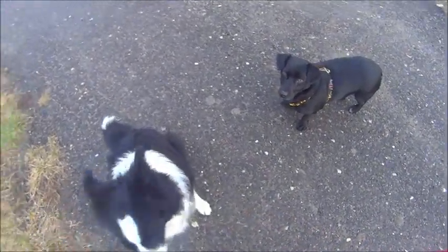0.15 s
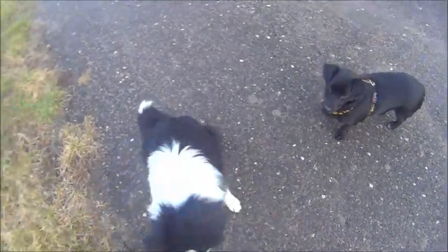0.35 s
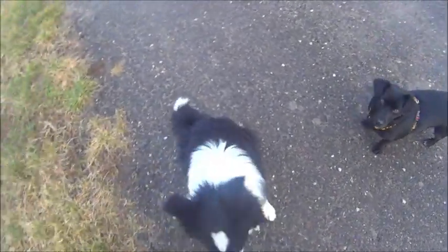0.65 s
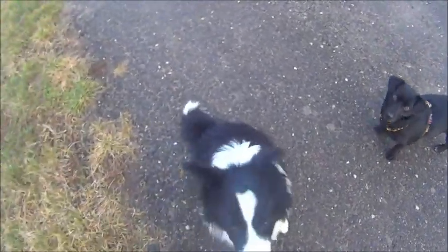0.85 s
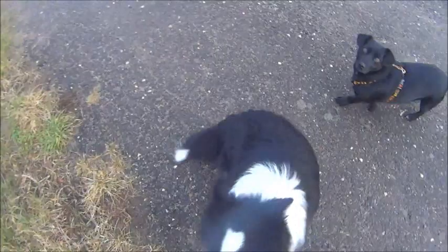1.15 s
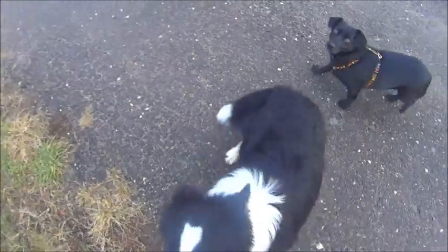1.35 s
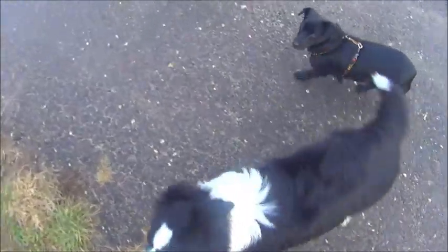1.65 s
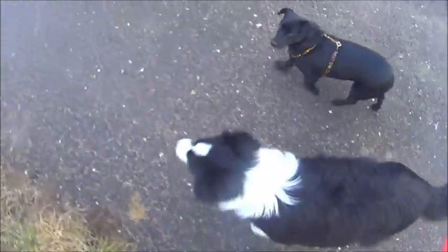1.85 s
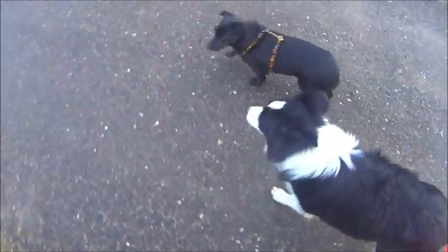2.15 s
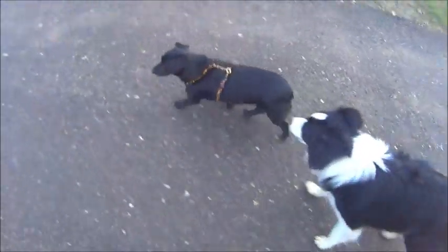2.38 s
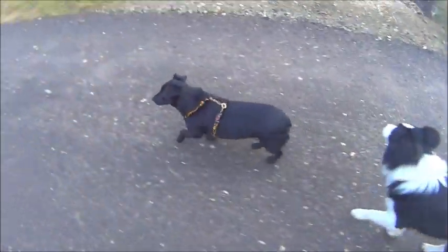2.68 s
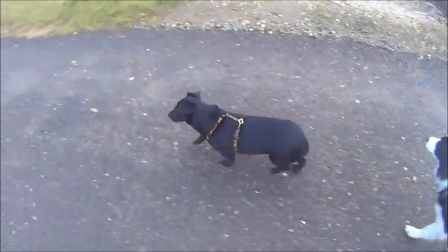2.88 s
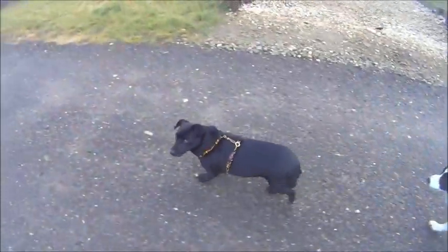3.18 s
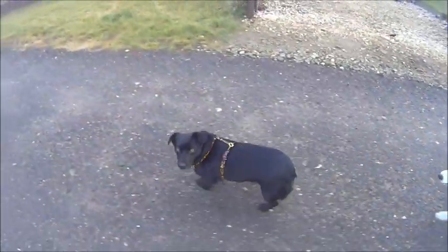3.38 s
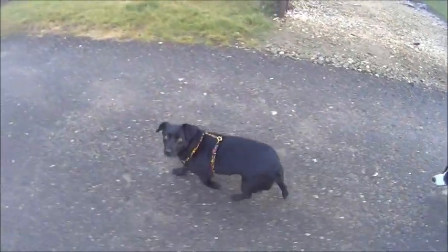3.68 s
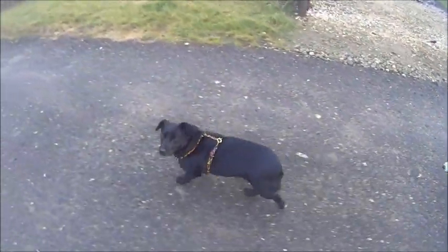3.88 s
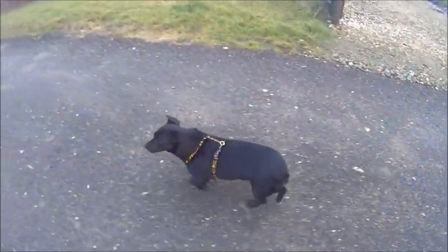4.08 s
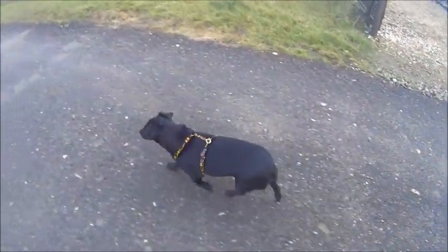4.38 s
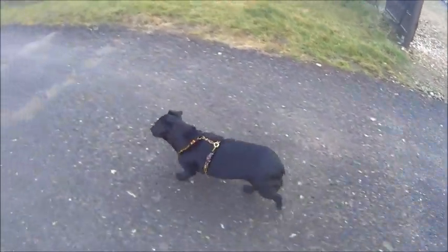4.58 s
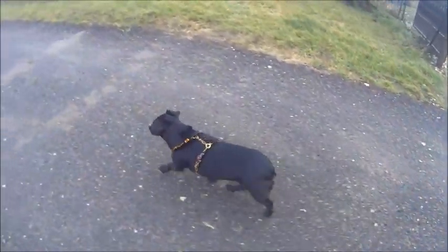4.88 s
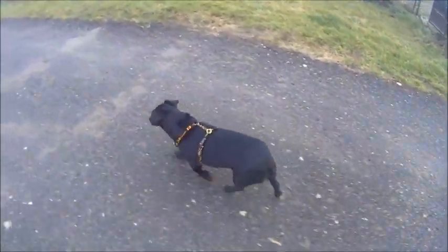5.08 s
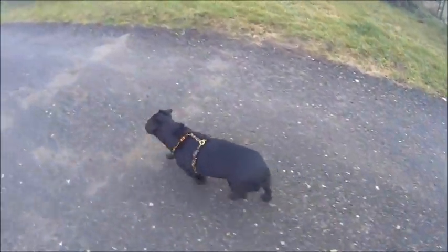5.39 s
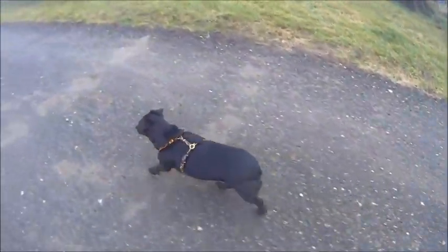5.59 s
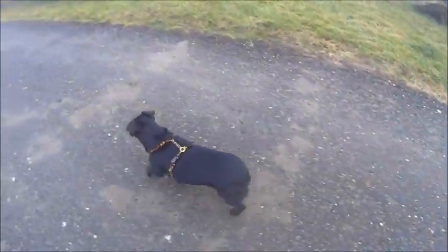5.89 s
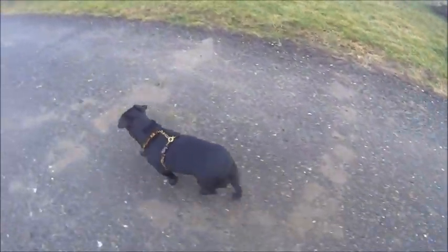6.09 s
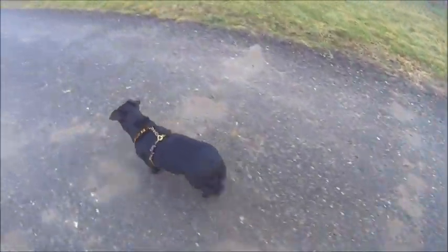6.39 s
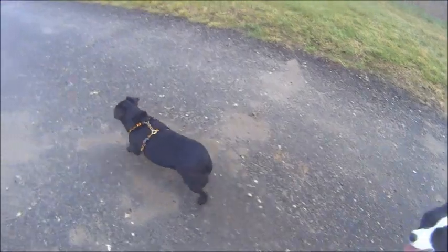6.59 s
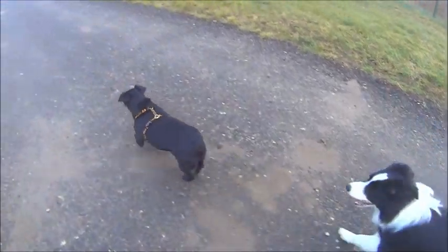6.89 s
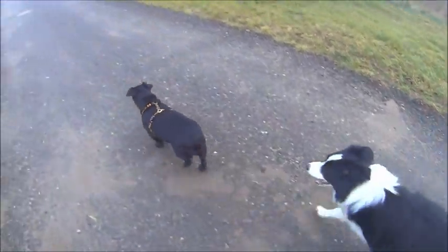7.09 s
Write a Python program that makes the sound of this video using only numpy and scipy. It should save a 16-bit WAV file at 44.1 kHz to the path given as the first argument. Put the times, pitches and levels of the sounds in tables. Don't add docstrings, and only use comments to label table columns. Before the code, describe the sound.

Close, dry handling noise outdoors: a hand and strap slide, tick and bump on a light plastic housing, ringing in a narrow nasal midrange. Two strong clusters come in the first three seconds, then scattered paw clicks, sole scuffs and grit crackles on asphalt. A sharp click and small stone clinks arrive late. The stereo microphone sits inside the housing, with constant amplifier hiss and limited extreme treble.

```python
import sys
import numpy as np
from scipy import signal
from scipy.fft import rfft, irfft, next_fast_len
from scipy.io import wavfile
from scipy.ndimage import uniform_filter1d

SR = 44100
rng = np.random.default_rng(int(sys.argv[2]) if len(sys.argv) > 2 else 0)


def inscribe(sig):
    pcm = np.round(np.clip(np.atleast_2d(sig).T, -1, 1) * 32767)
    wavfile.write(sys.argv[1], SR, pcm.astype(np.int16))


def linear_from_db(decibels):
    return 10 ** (np.asarray(decibels, float) / 20)


N = 319718
SIZE = next_fast_len(N + 8192)
HZ = np.maximum(np.arange(SIZE // 2 + 1) * SR / SIZE, 1)
TIME = np.arange(N) / SR
SIDES = np.array([[1], [-1]])

# (f/Hz, level/dB per Hz)
HISS_COLOUR = [(20, -2), (70, -2), (400, -1.5), (1000, -0.5), (2000, -5.5), (4000, -8), (8000, -12.5),
               (11000, -14)]
# (f/Hz, common share/0-1)
HISS_ALIKE = [(60, 1), (200, 0.49), (800, 0.68), (2000, 0.75), (4500, 0.35), (7500, 0.22), (11000, 0.57)]
# (f/Hz, turn/half turns)
HISS_TURN = [(60, .1), (300, .7), (1300, 1.1), (1650, 2.2), (3000, 2.85), (4000, 3.2), (5500, 4.0),
             (11000, 4)]
# (f/Hz, width/Hz, level/dB, left minus right/dB)
WHINE = (6755, 45, -74, 0)
# (t/s, level/dB)
ARM_SWINGS = [(.67, -47), (.95, -65), (1.3, -67), (1.73, -53.5), (2.35, -54), (2.56, -48), (3.0, -56.5),
              (3.5, -58), (4.18, -53.5), (4.7, -55), (5.31, -55), (6.0, -57), (6.5, -49), (7.1, -64)]

# (f/Hz, width/Hz, level/dB, left minus right/dB, left lead/rad)
CAVITY = [(1590.5, 111, 9, 0.5, -0.63), (1693, 158, 2, 1.5, -0.58)]
UPPER_CAVITY = [(1993, 78, -11, 0.88, -1.14), (2086, 130, -16, 0.93, -0.74)]
SHELL = [(2890, 620, 9.6, 1.1, 0.24), (3052, 296, 17, 0.67, 1.7), (4080, 330, 1, 5, 0.87)]
GRIT = [(5610, 180, 2, -3, 2.2), (7120, 1040, -4, -0.5, 0.79), (8420, 520, -9, 2, 0.39),
        (7200, 1900, -8, 5, 1)]
BODY = [(360, 55, 11, 0.31, -2.5), (237, 183, 3, .3, 1.27), (486, 170, -3.5, .3, -1),
        (606, 170, -5, 0.33, 2), (854, 260, -4.5, 0.99, -2)]
DEEP = [(125, 109, 15, 0.39, -0.096), (70, 35, 10, .1, -.3)]
PANEL = [(520, 500, 0, 0.26, -2.1)]
STRAP_RING = [(4990, 470, 1.5, 0.84, 0.19), (4380, 150, -1.5, 5, 3.7)]
WHISTLE_RING = [(5050, 230, 0.1, -3.5, .17), (4730, 220, -8, -3, .5), (4450, 200, -12, -4, 3),
                (7000, 600, -14, 1.5, 1.2), (3700, 900, -19, 1.5, 1)]
SLACK_RING = [(4770, 470, -2, -7, .5), (4280, 390, -1.5, -10.5, 3.2)]
CRUMB_RING = [(2180, 250, 0, 2.3, -2.5)]
SNAP_RING = [(2630, 280, 0, 2.9, 0.62)]
CLAW_RING = [(2000, 370, 0, 1.5, -0.9)]
CRACKLE_RING = [(7750, 900, 0.11, 1, 0.56), (9000, 1500, -1.1, 0, .5)]
SLAM_RING = [(132, 260, -2, .3, -1.5), (400, 170, 8, .5, -1.5), (545, 150, -3, .3, -2.2),
             (776, 160, -16, 1, -1), (1140, 230, -10, 1, 2.5)]

# (t/s, peak/dB, f/Hz, left minus right/dB)
STONES = [
    (0.782, -50, 5130, -4),
    (1.7834, -55, 5840, -0.5),
    (2.2466, -52, 5230, 1),
    (6.251, -38.5, 5870, 3),
    (6.279, -44, 4380, -9),
    (6.3, -58, 4770, -5),
    (7.0727, -43.5, 5850, 1),
]
# (t/s, peak/dB)
CRACKLES = [(.86, -48), (.8715, -40), (.9024, -39), (3.2623, -45), (3.2842, -47), (3.3047, -46),
            (3.322, -47), (3.337, -48), (3.358, -41), (3.384, -41), (3.397, -44), (3.4114, -33),
            (3.419, -48), (6.256, -38), (1.065, -46), (1.082, -48)]
# (t/s, hold/s, level/dB, rise/s, fall/s)
FIZZ = [
    (3.285, .125, -60, .03, .03),
]
# (centre t/s, peak/dB, f/Hz, length/ms)
CHIPS = [(.570, -41, 5200, 6.4), (.5795, -33, 3340, 4.6), (3.5859, -33.5, 1730, 4), (.6185, -22, 3370, 5.1),
         (0.622, -33, 1530, 6.6), (.648, -36, 4960, 8), (3.578, -38.5, 1700, 5), (.668, -36, 1590, 8.2),
         (0.69, -36, 3270, 4.6), (0.696, -42, 1600, 6.5), (2.474, -38.5, 4900, 11), (2.484, -36, 3300, 12),
         (2.497, -32, 3330, 13), (2.537, -37, 3580, 8), (2.56, -36, 1540, 5.5), (2.9839, -38, 1780, 4),
         (3.323, -47, 1590, 12), (3.384, -33, 1590, 7.7), (3.387, -42, 3040, 7), (3.397, -42, 1640, 6),
         (3.428, -45, 1630, 4.7), (5.74, -58, 5050, 45), (5.768, -57, 5050, 21), (5.795, -61, 5080, 24),
         (5.781, -51, 1950, 7.9), (5.796, -51, 2130, 9.8), (5.818, -46.5, 1600, 11), (5.833, -50, 2170, 20),
         (5.864, -52.5, 1210, 9.2), (5.899, -51, 2080, 16), (6.2535, -30, 1970, 6.5), (6.262, -49, 3020, 7),
         (6.274, -51, 4770, 6.6), (6.276, -48, 1650, 7), (6.298, -51, 4700, 5.4), (6.363, -45, 2040, 11),
         (6.42, -43, 2000, 8), (6.4255, -46, 2000, 6), (6.447, -40, 1920, 7.9), (6.4545, -33, 2030, 8),
         (6.461, -50, 3150, 8.9), (6.461, -53, 4740, 8.7), (0.8537, -31.5, 1560, 7), (.896, -38, 1560, 8.4),
         (0.98, -44, 1590, 6), (1.065, -42, 1650, 4.2), (1.082, -45, 2020, 4.1), (2.8077, -34, 1530, 3.9),
         (2.8947, -34.5, 1690, 4.5), (3.822, -40, 1700, 6)]
# (f/Hz, left lead/rad)
CHIP_LEAD = [(1600, -0.11), (2100, -1.2), (3200, 2.33), (5000, 0.66)]
# (t/s, peak/dB, upper cavity/dB, brightness/dB)
CRUMBS = [(0.58, -44, -5, 6), (.645, -29, -11, -23), (0.698, -36, -9, -20), (2.458, -28.5, 0, -9),
          (2.4708, -26, -9, -16), (2.4756, -25, -6, -9), (2.493, -22, -6, -19), (2.504, -19, -11, -17),
          (2.5146, -30, -9, -16), (2.521, -26, -9, -14), (2.527, -27, -9, -12), (2.537, -28, -9, -10),
          (2.798, -37, 10, -14), (3.2633, -40, -12, -21.5), (3.285, -32, -10, -17), (3.304, -38, -12, -16),
          (3.313, -36, -12, -20), (3.321, -40, -14, -22), (3.337, -31.5, -13, -9), (3.368, -36, -14, -20),
          (3.395, -46, -14, -20), (3.412, -37, -12, -10), (3.425, -37, -12, -20), (3.4446, -43, -1, -20),
          (3.594, -39, -3, -16), (3.604, -40, -6, -20), (5.2644, -36, 0, -20), (5.2817, -42, -5, -19),
          (5.3153, -39, -10, -20), (5.323, -34.5, -13, -25), (5.329, -37, -14, -25), (5.341, -46, -4, -20),
          (5.3524, -57, -2, -20), (5.3818, -50, 0, -20), (5.389, -48, 8, -22), (5.3934, -53, 5, -20),
          (5.414, -51, 2, -20), (5.971, -44, -6, -21), (6.076, -49, -3, -20), (6.092, -45, -11, -23),
          (6.112, -38, -15, -23), (6.169, -42, -9, -23), (6.251, -33, 7, -12), (6.9782, -38, -6, -14),
          (6.998, -46, -5, -20), (7.015, -36, -8, -20), (7.023, -45, -2, -20), (7.056, -38, -6, -20),
          (7.0874, -49, 3, -20)]
# (t/s, hold/s, level/dB, rise/s, fall/s)
WHISTLE = [
    (.55, 0.069, -50, 0.059, 0.069),
    (.64, 0.015, -49, 0.049, 0.13),
    (.785, .01, -64, .03, .04),
]
# (t/s, hold/s, level/dB, rise/s, fall/s)
SLUMPS = [
    (.585, 0.051, -45, 0.087, 0.025),
    (.66, 0.024, -47, 0.051, 0.18),
]
# (t/s, hold/s, level/dB, rise/s, fall/s)
STRAP_SLIDES = [
    (.91, 0.0039, -62, 0.046, 0.028),
    (1.06, 0.02, -62.5, 0.04, 0.042),
    (2.276, .005, -67, 0.064, 0.066),
    (2.47, 0.063, -53, 0.033, 0.029),
    (3.276, 0.12, -63, 0.054, 0.16),
    (5.82, .01, -68, 0.027, .05),
    (6.275, 0.02, -65, 0.017, 0.03),
    (7.074, 0.0059, -62, .004, 0.016),
]
# (t/s, peak/dB, deep part/dB)
THUDS = [(0.464, -50.5, -17.5), (0.566, -49, -22), (0.612, -40.5, 2), (0.664, -46.5, 3), (0.69, -46, -5),
         (1.063, -41.5, -20), (1.126, -43, -18), (1.733, -46.5, -12), (1.831, -47.5, -7.5),
         (2.214, -48.5, -22), (2.269, -37, -25), (2.485, -37.5, -13), (2.545, -26.5, -13.5),
         (2.69, -37.5, -24), (2.7317, -31.5, -19.5), (2.845, -48, -11), (3.029, -39, -16),
         (3.275, -48.5, -11), (3.383, -41.5, -15), (3.577, -48, -17), (4.141, -48.5, -13),
         (4.428, -39.5, -27), (4.514, -47, -34), (4.594, -46.5, -40), (5.287, -60, -3), (6.448, -50, -23),
         (6.631, -53.5, -2)]
# (t/s, peak/dB)
SLAMS = [
    (.6165, -22.5),
    (2.5475, -20.5),
]
# (t/s, peak/dB, upper cavity/dB, brightness/dB)
CLAWS = [(0.5326, -41, 10, -14), (5.797, -54, 12, -15), (1.737, -50, -9, 3.5), (2.0828, -44.5, 15.5, -3.5),
         (2.3541, -39, 12.5, -16), (2.39, -30.5, -2, -19), (5.875, -37, 4, -20), (2.8, -25, -9, -27),
         (2.8067, -29, -17, -22), (2.8942, -33.5, -3, -17.5), (2.9829, -28, -8, -23), (3.0683, -34, 3, -20),
         (3.5768, -33, -22, -27), (3.583, -29, -22, -21), (3.8122, -33, -6, -30), (4.167, -23.5, -8, -21.5),
         (4.368, -41, 2.5, -21), (5.3646, -49.5, 13, -15), (5.4333, -50, 14, -10), (5.557, -33.5, -7, -27),
         (5.816, -42, 7, -13), (6.001, -40, -34, -33), (6.356, -36.5, 3, -13.5), (6.409, -45.5, 8, -1),
         (6.4504, -17.5, -4, -32), (6.518, -35, -14, -22), (6.762, -40.5, 5.5, -30),
         (6.854, -37.5, -25, -20), (6.955, -32, -3, -14), (7.0423, -46, 14, -24)]
# (t/s, peak/dB)
SNAPS = [(0.579, -34), (1.247, -46), (2.42, -43.5), (2.443, -50), (2.624, -41), (2.6918, -30),
         (2.7063, -46), (2.712, -42), (2.718, -38), (2.734, -19.5), (3.189, -42.5), (3.212, -48),
         (4.515, -48), (5.464, -46)]
# (t/s, peak/dB, brightness/dB, contact/ms)
KNOCKS = [(0.6167, -11, -20, 2), (0.6677, -25, -37, 2.3), (0.768, -36.5, -21, 2.4), (0.851, -42, -20, 3.9),
          (0.903, -33.5, -17, 5.4), (1.0338, -41, -17, 2.4), (1.1269, -33, -14.5, 1.6),
          (2.2146, -45, -12, 1.9), (2.2709, -22.5, -23, 2.9), (2.543, -24, -16, 3.5),
          (2.482, -18, -16, 4.8), (2.5474, -10, -18.5, 5.7), (2.5548, -12, -36, 2.4),
          (2.6068, -35, -13.5, 4.3), (5.826, -42, -13, 3.2), (3.247, -37, -30, 3.7), (3.275, -32, -20, 2.2),
          (3.2847, -49, -2.5, 3), (3.3811, -33, -13, 7.2), (3.407, -33, -16.5, 2.5),
          (3.984, -40.5, -20, 1.8), (4.1436, -34.5, -15.5, 8.1), (4.597, -42, -15, 1),
          (4.7555, -33.5, -28, 2.1), (4.828, -37.5, -34, 2), (5.3028, -38, -18, 4), (5.614, -44, -29, 2.7),
          (5.8893, -36, -29, 9.2), (6.2514, -24, -15.5, 4.5), (7.064, -23.5, -26, 1.9)]
# (t/s, level/dB, rise/s, fall/s)
GRIPS = [(.65, -48.5, 0.16, 0.21), (0.902, -44, 0.081, 0.056), (1.12, -59.5, 0.36, 0.63),
         (1.85, -58, 0.052, 0.37), (2.3, -60, 0.11, 0.085), (2.56, -42, 0.25, 0.075),
         (2.75, -59, 0.33, 0.35), (3.421, -50, 0.37, 0.043), (3.61, -52.5, 0.12, 0.02),
         (4.14, -64, 0.026, 0.088), (5.3, -54, 0.045, 0.04)]
# (t/s, level/dB, rise/s, fall/s)
SCUFFS = [(.44, -60.5, 0.99, 0.37), (.8, -59, 0.17, .2), (1.3, -64, 1, 0.43), (1.73, -56, 0.17, 0.17),
          (2.249, -60, 0.11, 0.092), (2.363, -50, 0.23, 0.13), (2.81, -57.5, 0.053, 0.37),
          (3.0, -56.5, 0.47, 0.81), (3.35, -48, 0.07, 0.14), (3.6, -55, 0.22, 1), (4.15, -53.5, 0.25, 0.18),
          (4.71, -54, 0.44, 1), (5.2, -55.5, 0.082, .1), (5.34, -58, 0.24, 0.58), (5.81, -64, 0.17, 0.17),
          (5.89, -52, 0.15, 0.077), (6.01, -53, 0.078, 0.3), (6.1, -64, 0.6, 0.2), (6.3, -58.5, .1, 0.46),
          (6.44, -54, 0.32, 0.23), (6.513, -58, 0.23, 0.082), (6.74, -61.5, 0.45, 1),
          (7.02, -51, 0.047, 0.073), (7.075, -50.5, 0.043, 0.066), (7.24, -60.5, 0.54, .2)]
# (t/s, hold/s, level/dB, rise/s, fall/s)
RUBS = [(.565, 0.039, -49, 0.094, 0.12), (.645, 0.038, -46.5, 0.061, 0.12), (.9, 0.024, -53, 0.13, 0.031),
        (1.11, 0.036, -53.5, 0.4, 0.036), (1.73, 0.0045, -61.5, 0.6, 0.085),
        (1.964, .005, -59.5, 0.24, 0.41), (2.265, .005, -50.5, 0.036, 0.079),
        (2.47, 0.042, -41, 0.024, 0.013), (2.52, 0.036, -33, 0.016, .008), (2.575, 0.03, -47, 0.013, 0.063),
        (2.685, 0.0055, -55, 0.02, 0.11), (3.278, 0.14, -55, 0.041, 0.027),
        (3.476, .005, -54.5, 0.05, 0.18), (4.12, .005, -65, 0.17, 0.084), (5.26, .005, -61.5, 0.2, .1),
        (5.81, .005, -61, 0.32, 0.15), (6.265, 0.0042, -60, .02, 0.063), (6.444, 0.0058, -61, 0.1, 0.062)]
# (cavity/dB, upper cavity/dB, body/dB, shell/dB, grit/dB)
RUB_MIX = (1.2, -5.5, -7.5, -2, -8.5)
SCUFF_MIX = (-0.3, -4.5, -14, -9, -16.5)
GRIP_MIX = (-22, -17, -1, -20, -10.5)


def unit(x):
    return x / np.sqrt(np.mean(x ** 2))


def smooth_twice(x, size):
    return uniform_filter1d(uniform_filter1d(x, size), size)


def shape(x, response):
    return irfft(rfft(x, SIZE) * response, SIZE)[..., :N]


def along(table):
    hz, value = np.transpose(table)
    return np.interp(np.log(HZ), np.log(hz), value)


def ring(hz, width):
    return 1j * HZ * width / (hz ** 2 - HZ ** 2 + 1j * HZ * width)


def body(modes):
    total = 0
    for hz, width, db, pan_db, lead in modes:
        steep = ring(hz, width) * ring(hz, 4 * width)
        total = total + linear_from_db(db + SIDES * pan_db / 2) * np.exp(.5j * SIDES * lead) * steep
    return total / np.abs(irfft(total, SIZE)).max()


def swells(s, db, rise_s, fall_s, hold_s=0):
    coarse = TIME[::32]
    late = coarse - np.asarray(s)[:, None]
    rise, fall, hold = (np.clip(v * np.ones(len(late)), 1e-3, 3)[:, None] for v in (rise_s, fall_s, hold_s))
    drop_db = 20 * np.maximum(np.maximum(-late / rise, (late - hold) / fall), 0)
    power = np.sum(linear_from_db(2 * (db[:, None] - drop_db)), axis=0)
    return np.interp(TIME, coarse, np.sqrt(power))


def held(table):
    s, hold_s, db, rise_s, fall_s = np.transpose(table)
    return swells(s, db, rise_s, fall_s, hold_s)


def blows(times, contact_ms, blow=1):
    age = np.abs(np.arange(700) - 60) / SR
    size = (len(times), 700)
    chatter = rng.standard_normal(size) * (rng.random(size) < .1)
    force = .3 * chatter * np.exp(-age / np.clip(contact_ms, .2, 20)[:, None] * 1000)
    force[:, 60] = blow
    force /= np.sqrt(np.sum(force ** 2, axis=1, keepdims=True))
    at = np.round(times * SR).astype(int)[:, None] + np.arange(700) - 48
    return at, force


def strike(at, force, db):
    x = np.zeros(N + 700)
    np.add.at(x, at, force * linear_from_db(db)[:, None])
    return x[:N]


def hits(table, modes, contact_ms, blow):
    s, db = np.transpose(table)
    at, force = blows(s, np.full(len(s), contact_ms), blow)
    return shape(strike(at, force, db), body(modes))


def contacts(housing, s, db, upper_db, shell_db, grit_db, contact_ms, soft=1, blow=1):
    at, force = blows(s, contact_ms * np.ones(len(s)), blow)
    bright = housing["grit"] + linear_from_db(-2.0) * housing["strap"]
    parts = ((housing["cavity"] * soft, db - 1.0),
             (housing["upper"] * soft, db + upper_db),
             (housing["shell"], db + shell_db),
             (bright, db + grit_db))
    return sum(shape(strike(at, force, part_db), response) for response, part_db in parts)


def grains():
    clicks_per_s, scatter_db, smooth = 1200, 1.5, 0.36
    size_db = scatter_db * np.minimum(rng.exponential(size=N), 4)
    clicks = (rng.random(N) < clicks_per_s / SR) * rng.choice([-1, 1], N) * linear_from_db(size_db)
    flurry = unit(smooth_twice(rng.standard_normal(N), 300))
    return unit(linear_from_db(2.7 * flurry) * (unit(clicks) + smooth * rng.standard_normal(N)))


def hiss():
    common, left, right, whine = rng.standard_normal((4, N))
    alike = np.clip(along(HISS_ALIKE), 0, 1)
    turn = np.exp(-.5j * np.pi * SIDES * along(HISS_TURN))
    colour = linear_from_db(along(HISS_COLOUR))
    noise = shape(common, colour * np.sqrt(alike) * turn)
    noise = noise + shape(np.array([left, right]), colour * np.sqrt(1 - alike))
    hz, width, db, pan_db = WHINE
    tone = unit(shape(whine, body([(hz, width, 0, pan_db, 2.8)])))
    return linear_from_db(-56.5) * unit(noise) + linear_from_db(db) * tone


def sway():
    s, db = np.transpose(ARM_SWINGS)
    mid, side = rng.standard_normal((2, N))
    slope = HZ / (HZ + 8) / (1 + (HZ / 18) ** 2.05)
    gain = swells(s, db, rise_s=0.12, fall_s=0.18) + linear_from_db(-70)
    return gain * unit(shape(mid + 0.059 * SIDES * side, slope))


def stones():
    t60_s, attack_s = 0.015, 0.0026
    out, age = np.zeros((2, N)), np.arange(1200) / SR
    for s, db, hz, pan_db in STONES:
        rough = 1 + 2 * uniform_filter1d(rng.standard_normal((2, 1200)), size=40, axis=1)
        fade = np.exp(-np.log(1000) * age / t60_s) * np.minimum(age / attack_s, 1)
        clink = rough * np.sin(2 * np.pi * hz * age) * fade
        start = int(s * SR)
        out[:, start:start + 1200] += linear_from_db(db + 10.0 + SIDES * pan_db / 2) * clink
    return out


def crackles():
    fizz = held(FIZZ) * unit(shape(rng.standard_normal((2, N)), body(CRACKLE_RING)))
    return fizz + hits(CRACKLES, CRACKLE_RING, contact_ms=1.6, blow=.4)


def chips():
    out, age = np.zeros((2, N)), np.arange(-1500, 1500) / SR
    for s, db, hz, ms in CHIPS:
        rough = 1 + .3 * unit(uniform_filter1d(rng.standard_normal(3000), size=90))
        lead = np.interp(hz, *np.transpose(CHIP_LEAD))
        swell = np.exp(-(age * np.where(age < 0, 4.5, 2.6) * 1000 / ms) ** 2)
        tone = np.sin(2 * np.pi * hz * age + SIDES * lead / 2)
        middle = int(s * SR)
        out[:, middle - 1500:middle + 1500] += linear_from_db(db) * swell * rough * tone
    return out


def crumbs(housing):
    s, db, upper_db, bright_db = np.transpose(CRUMBS)
    loose = dict(housing, upper=body(CRUMB_RING))
    return contacts(loose, s, db - 2.0, upper_db, bright_db + 3.0, bright_db - 2.0, contact_ms=3.7, blow=0.53)


def whistle():
    out = 0
    for table, modes in ((WHISTLE, WHISTLE_RING), (SLUMPS, SLACK_RING)):
        near, far, patch = rng.standard_normal((3, N))
        patchy = linear_from_db(2 * unit(smooth_twice(patch, 350)))
        out = out + held(table) * unit(shape(patchy * (near + 0.25 * SIDES * far), body(modes)))
    return out


def strap(housing):
    friction = grains() + 0.43 * SIDES * grains()
    return linear_from_db(6.5) * held(STRAP_SLIDES) * unit(shape(friction, housing["strap"]))


def thuds(housing):
    s, db, deep_db = np.transpose(THUDS)
    at, force = blows(s + 0.00273, np.full(len(s), 6.2))
    rocking = shape(strike(at, force, db + 2.5), housing["body"] + linear_from_db(-11) * body(PANEL))
    return rocking + shape(strike(at, force, db + deep_db + 12.5), body(DEEP))


def slams():
    return hits(SLAMS, SLAM_RING, contact_ms=1.2, blow=1)


def claws(housing):
    s, db, upper_db, bright_db = np.transpose(CLAWS)
    port = ring(1926, 710) ** 2
    rough = dict(housing, upper=body(CLAW_RING))
    return contacts(rough, s, db, upper_db, bright_db + 5, bright_db + 2.5, contact_ms=2.6, soft=port)


def snaps(housing):
    s, db = np.transpose(SNAPS)
    catch = dict(housing, upper=body(SNAP_RING))
    return contacts(catch, s, db, upper_db=-7, shell_db=-5, grit_db=-25, contact_ms=.7)


def knocks(housing):
    s, db, bright_db, contact_ms = np.transpose(KNOCKS)
    crisp = np.minimum(5 / contact_ms, 1)
    return contacts(housing, s, db, -26, bright_db + 11, bright_db + 11.5, contact_ms, blow=crisp)


def rubbing(housing):
    scuffing, gripping = swells(*np.transpose(SCUFFS)), swells(*np.transpose(GRIPS))
    power = np.array([held(RUBS), scuffing, gripping]) ** 2
    gains = np.sqrt(linear_from_db(2 * np.transpose([RUB_MIX, SCUFF_MIX, GRIP_MIX])) @ power)
    near, far = grains(), grains()
    out = linear_from_db(-79.5) * unit(shape(grains(), housing["cavity"] + linear_from_db(4.0) * housing["upper"]))
    names = ("cavity", "upper", "body", "shell", "grit")
    for name, gain, apart in zip(names, gains, (.15, .2, .4, .6, .7)):
        out = out + gain * unit(shape(near + apart * SIDES * far, housing[name]))
    return out


def scene():
    parts = dict(cavity=CAVITY, upper=UPPER_CAVITY, shell=SHELL, grit=GRIT, strap=STRAP_RING, body=BODY)
    housing = {name: body(modes) for name, modes in parts.items()}
    background = hiss() + sway()
    ground = stones() + crackles() + chips() + crumbs(housing) + claws(housing)
    webbing = whistle() + strap(housing)
    jolts = thuds(housing) + slams()
    hand = snaps(housing) + knocks(housing) + rubbing(housing)
    return background + ground + webbing + jolts + hand


def top_cut(x):
    return signal.sosfilt(signal.butter(12, 12340, fs=SR, output="sos"), x)


def record(dry):
    low_pass = signal.ellip(9, .3, 33, 11020, fs=SR, output="sos")
    return top_cut(signal.sosfilt(low_pass, dry))


dry = scene()
out = record(dry)
inscribe(out)
```